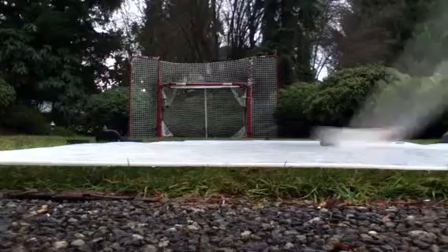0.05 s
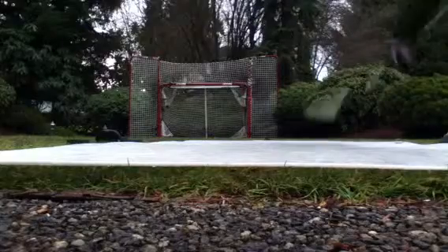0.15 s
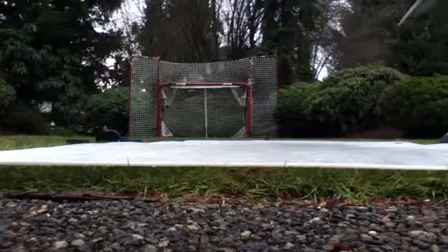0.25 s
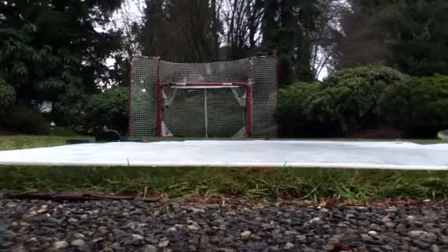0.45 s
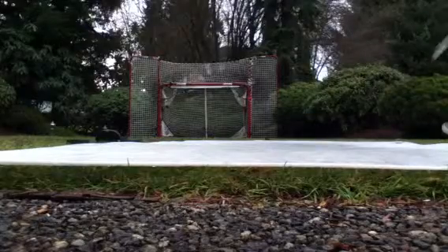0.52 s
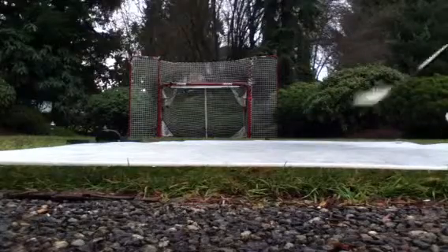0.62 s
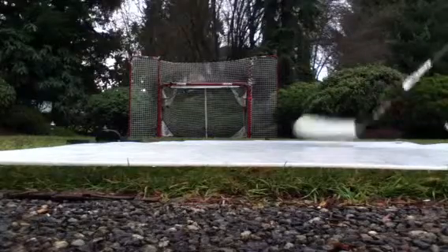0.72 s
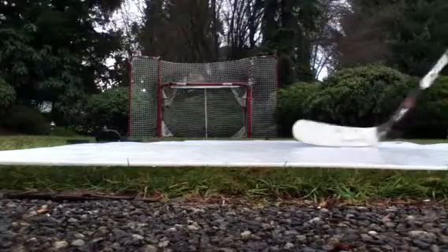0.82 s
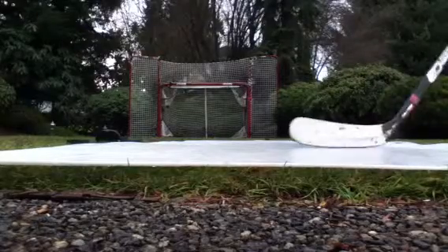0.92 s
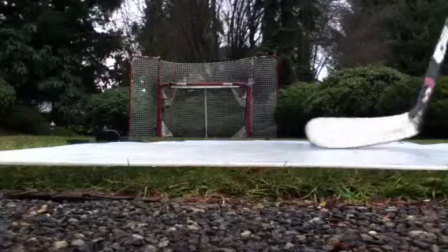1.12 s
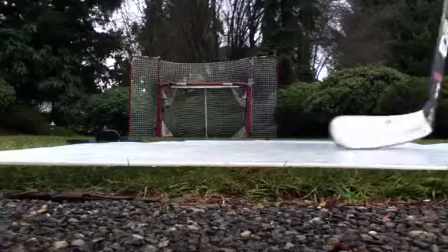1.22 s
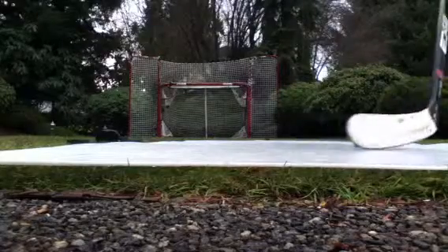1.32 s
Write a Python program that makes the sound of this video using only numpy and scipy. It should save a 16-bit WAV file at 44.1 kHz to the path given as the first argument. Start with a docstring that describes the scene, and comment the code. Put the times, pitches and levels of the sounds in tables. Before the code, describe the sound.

A hockey slap shot: the stick squeaks briefly, slaps a plastic pad and cracks against the puck. The puck clangs off a steel goal, then the blade drops back and scuffs. Heard from ground level in a quiet backyard.

```python
"""A hockey stick drives a slap shot in a quiet backyard. It squeaks by stick-slip friction, slaps a plastic
shooting pad and cracks against the puck. A third of a second later the puck excites the ringing modes of
a steel goal frame; then the blade drops back on the pad and scuffs it. Each impact is a short contact
pulse followed by damped vibration. Trees and walls scatter the blows over a faint hush and a low hum."""
import sys
import numpy as np
from scipy import signal
from scipy.fft import rfft, irfft
from scipy.io import wavfile
from scipy.ndimage import uniform_filter1d

SR = 44100
rng = np.random.default_rng(int(sys.argv[2]) if len(sys.argv) > 2 else 0)


def to_wav(sig):
    """Store sig (one row per channel, or 1-D mono) as 16-bit WAV at the path in sys.argv[1].

    Samples outside -1..1 are clipped; the rate is SR.
    """
    pcm = np.clip(np.atleast_2d(sig), -1, 1) * 32767
    pcm = np.round(pcm).astype(np.int16)
    wavfile.write(sys.argv[1], SR, pcm.T)  # frames by channels


N = 59535

# spectrum of the outdoor hush, and partials of the hum: f/Hz, relative level/dB
HUSH_SPECTRUM = [(30, -9), (70, -5), (130, 0), (300, -2), (500, -6), (800, -5), (1400, -7), (3000, -14),
                 (6000, -22), (12000, -27), (16000, -35)]
HUM_PARTIALS = [(122.5, 0), (243, -3)]
# envelopes of the hush and the hum: t/s, level/dB
HUSH_ENVELOPE = [(0, -48), (.19, -47.5), (.3, -55), (.7, -58), (.88, -55), (.97, -51), (1.07, -50),
                 (1.15, -53.5), (1.25, -50.5), (1.35, -50)]
HUM_ENVELOPE = [(0, -51), (.2, -49), (.33, -61), (.65, -62), (.85, -57), (1.05, -61), (1.35, -57)]
# scuffs of the stick: centre t/s, half-width/s, level/dB, peak f/Hz
SCUFFS = [(.009, .007, -45, 2500), (.025, .003, -40, 2900), (.105, .004, -33, 1400), (.207, .007, -41, 300),
          (1.045, .0055, -43, 1450), (1.21, .025, -54, 3000), (1.307, .002, -45.5, 1300)]
# thin cracks as the blade first touches the pad: t/s, level/dB
CRACKS = [(.2151, -1.5), (.9090, -25)]
# blows of the blade on the pad: t/s, click level/dB, contact time/s, thud gain/dB, clatter level/dB
SLAPS = [(.2163, -13, .0003, 0, -19.5), (.9093, -16, .00018, -6.5, -37)]
# modes of the pad: f/Hz, level/dB, T60/s
PAD_MODES = [(125, -27, .1), (215, -22, .04), (350, -9, .022), (540, -7, .013), (800, -12, .015),
             (1350, -21, .015), (1750, -22, .014), (3150, -21, .01)]
# spectra of a slap's crack, bright bite and clatter: f/Hz, relative level/dB
CRACK_SPECTRUM = [(2000, -35), (5000, -20), (7500, -5), (12000, 0), (16000, -1)]
BITE_SPECTRUM = [(1000, -12), (3000, 0), (5000, -6), (8000, -5), (16000, -14)]
CLATTER_SPECTRUM = [(60, -20), (200, -1), (500, 0), (1000, -4), (2000, -10), (4000, -18), (8000, -25),
                    (16000, -32)]
# knocks of puck and stick: t/s, level/dB, contact time/s, rebound f/Hz
KNOCKS = [(.2409, -7, .00012, 500), (.2413, 0, .0003, 750), (.2557, -10, .00014, 600),
          (.2586, -14, .0003, 600), (.2624, -13, .0005, 550), (.2638, -20, .0003, 1300),
          (.358, -28, .0003, 1200), (.9685, -32, .0005, 450), (1.0415, -29, .0004, 1250),
          (1.307, -34, .0004, 1200)]
# brief dip of the slap and background after the puck is hit: t/s, gain/dB
DIP = [(.242, 0), (.245, -26), (.251, -28), (.256, 0)]
# spectra of the scattered shot, clang and blade landing: f/Hz, relative level/dB
SHOT_NEAR_SPECTRUM = [(110, -26), (180, 1), (300, -2), (500, -2), (800, 1), (1400, 0), (2500, -8),
                      (5000, -18), (10000, -21), (16000, -38)]
SHOT_FAR_SPECTRUM = [(100, -16), (300, -6), (650, -1), (1000, -4), (1400, 1), (2200, -10), (5000, -21),
                     (10000, -34), (16000, -50)]
TREE_ECHO_SPECTRUM = [(100, -12), (200, -1), (650, 0), (1300, -6), (3000, -15), (8000, -28), (16000, -45)]
GOAL_NEAR_SPECTRUM = [(150, -28), (450, -20), (650, 1), (1400, 1), (2400, -1), (4500, -4), (8000, -8),
                      (12500, -13), (16000, -27)]
GOAL_FAR_SPECTRUM = [(350, -26), (650, 0), (1000, -1), (1450, 3), (2000, -2), (2700, -2), (5000, -10),
                     (9000, -18), (15000, -38)]
PAD_ECHO_SPECTRUM = [(120, -20), (250, 0), (650, -1), (1200, -14), (2500, -22), (6000, -40), (16000, -50)]
# faint ringing in the yard after the shot: onset t/s, then f/Hz, level/dB, T60/s
YARD_RING_S, YARD_RING = .27, [(1290, -42, .4), (1410, -38, .6), (1574, -47, .55)]
# modes of the steel goal frame: f/Hz, level/dB, T60/s
GOAL_MODES = [(1072, -35, .4), (1354, -36, .85), (1555, -13, .045), (1580, -24, .27), (1765, -21, .06),
              (2380, -33, .35), (2501, -17, .055), (2928, -27, .1), (3110, -26, .05), (3635, -32, .27),
              (3800, -25, .05), (3930, -24, .06), (4593, -27, .07), (4850, -26, .06), (7160, -32, .12),
              (11800, -26, .06)]
# spectrum of its densely spaced modes: f/Hz, relative level/dB
CLANG_SPECTRUM = [(150, -18), (330, -11), (480, -15), (900, -4), (1500, 0), (2300, 0), (4200, -2),
                  (6000, -6), (7400, -5), (10300, -17), (11700, -6), (13000, -12), (14000, -18),
                  (16000, -28)]
# discrete reflections of the clang: delay/s, gain/dB
GOAL_ECHOES = [(.0295, -17), (.042, -18)]

TIME = np.arange(N) / SR


def amp(db):
    """Amplitude ratio: a factor of ten for every 20 dB."""
    return 10 ** (np.asarray(db) / 20)


def envelope(points):
    """Amplitude envelope, linear in decibels between its points."""
    return amp(np.interp(TIME, *np.transpose(points)))


def swell(s, half_s, db):
    """Gaussian envelope centred on time s."""
    return amp(db) * np.exp(-.5 * ((TIME - s) / half_s) ** 2)


def decay(age, t60):
    """Exponential damping: the level falls 60 dB in t60 seconds."""
    return amp(-60 * age / t60)


def low_cut(x, hz):
    """Second-order high-pass: bass falls 12 dB per octave below the corner."""
    return signal.sosfilt(signal.butter(2, hz, "high", fs=SR, output="sos"), x + 1e-18)


def noise(spectrum):
    """Spectral shaping of white noise, normalised to unit rms."""
    hz, db = np.transpose(spectrum)
    freqs = np.maximum(np.arange(N // 2 + 1) * SR / N, 1)
    bass_rolloff = np.minimum(freqs / hz[0], 1) ** 2
    gain = amp(np.interp(np.log(freqs), np.log(hz), db)) * bass_rolloff
    shaped = irfft(rfft(rng.standard_normal(N)) * gain, N)
    return shaped / np.std(shaped)


def burst(spectrum, s, db, t60, attack_s=2 / SR):
    """Exponential build-up and decay of coloured noise."""
    age = np.maximum(TIME - s, 0)
    return amp(db) * noise(spectrum) * (1 - np.exp(-age / attack_s)) * decay(age, t60)


def mode(s, hz, db, t60):
    """Free vibration of one mode: a damped sinusoid."""
    age = np.maximum(TIME - s, 0)
    return amp(db) * np.sin(2 * np.pi * hz * age) * decay(age, t60)


def contact(s, db, contact_s):
    """Pressure pulse of a hard collision: the shorter the contact, the wider the spectrum."""
    progress = np.clip((TIME - s) / contact_s, 0, 1)
    return amp(db) * (4 * progress * (1 - progress)) ** .3   # a power below 1 steepens the edges


def knock(s, db, contact_s, hz):
    """A contact pulse drives a damped resonator, which loses 60 dB in two cycles."""
    radius = decay(1 / SR, t60=2 / hz)
    feedback = [1, -2 * radius * np.cos(2 * np.pi * hz / SR), radius ** 2]
    return signal.lfilter([1, -2, 1], feedback, contact(s, db, contact_s) + 1e-18)


def background():
    """Ambient sound: broadband outdoor hush superposed on the two partials of a distant hum."""
    hum = sum(amp(db) * np.sin(2 * np.pi * (hz * TIME + rng.random())) for hz, db in HUM_PARTIALS)
    return envelope(HUSH_ENVELOPE) * noise(HUSH_SPECTRUM) + envelope(HUM_ENVELOPE) * hum


def stick_scuffs(rise_db_per_octave=10, fall_db_per_octave=8, top_hz=11000):
    """Sliding friction gives soft swells of noise, each with one broad spectral peak."""
    octaves = np.arange(-4, 6)
    shape_db = np.minimum(rise_db_per_octave * octaves, -fall_db_per_octave * octaves)
    friction = sum(swell(s, half_s, db) * noise(np.transpose([hz * 2. ** octaves, shape_db]))
                   for s, half_s, db, hz in SCUFFS)
    return signal.sosfilt(signal.butter(2, top_hz, fs=SR, output="sos"), friction)


def stick_squeak(start_s=.095, length_s=.016, from_hz=1400, to_hz=2050):
    """Stick-slip oscillation: a rising tone and its octave, roughened by frequency jitter."""
    progress = np.clip((TIME - start_s) / length_s, 0, 1)
    jitter = uniform_filter1d(rng.standard_normal(N), size=20)
    glide_hz = from_hz + (to_hz - from_hz) * progress
    hz = glide_hz * (1 + .075 * jitter / np.std(jitter))
    phase = 2 * np.pi * np.cumsum(hz) / SR
    tone = np.sin(phase) + amp(-15) * np.sin(2 * phase)
    return amp(-26.5) * np.sin(np.pi * progress) * tone


def pad_slaps():
    """Impact excitation: the blade cracks and clatters on the pad, whose damped modes give a thud."""
    cracks = sum(burst(CRACK_SPECTRUM, s, db, t60=.005) for s, db in CRACKS)
    grind = swell(s=.239, half_s=.0035, db=-24) * noise(CLATTER_SPECTRUM)   # blade slides into the puck
    sound = cracks + grind
    for s, click_db, contact_s, thud_db, clatter_db in SLAPS:
        thud = sum(mode(s, hz, db + thud_db, t60) for hz, db, t60 in PAD_MODES)
        clatter = burst(CLATTER_SPECTRUM, s, clatter_db, t60=.11, attack_s=.001)
        click = contact(s, click_db, contact_s)
        bite = burst(BITE_SPECTRUM, s, click_db - 13, t60=.02)
        bass_edge_hz = 125 / amp(thud_db)   # lighter blows carry less bass
        sound += low_cut(click + bite + thud + clatter, bass_edge_hz)
    return sound


def blade_knocks():
    """Each hard collision on the blade also excites a bending mode of the shaft."""
    return sum(knock(s, db, contact_s, hz) + mode(s, hz=175, db=db - 17, t60=.018)
               for s, db, contact_s, hz in KNOCKS)


def yard_scatter():
    """Diffuse scattering: near walls return short tails of noise, far trees longer and fainter ones."""
    shot = burst(SHOT_NEAR_SPECTRUM, s=.252, db=-26, t60=.42, attack_s=.014)
    shot += burst(SHOT_FAR_SPECTRUM, s=.27, db=-36.5, t60=1.3, attack_s=.04)
    ringing = sum(mode(YARD_RING_S, hz, db, t60) for hz, db, t60 in YARD_RING)
    tree_echo = swell(s=.5, half_s=.045, db=-45) * noise(TREE_ECHO_SPECTRUM)
    clang = burst(GOAL_NEAR_SPECTRUM, s=.583, db=-24.2, t60=.28, attack_s=.011)
    clang += burst(GOAL_FAR_SPECTRUM, s=.63, db=-39.5, t60=1.6, attack_s=.04)
    landing = burst(PAD_ECHO_SPECTRUM, s=.919, db=-34, t60=.2, attack_s=.006)
    return shot + ringing + tree_echo + clang + landing


def goal_clang(hit_s=.567, lag_s_per_hz=2.5e-7):
    """Modal vibration of the struck steel frame; its clack and dense clang are reflected twice."""
    # higher modes set in slightly later
    modes = sum(mode(hit_s + lag_s_per_hz * hz, hz, db, t60) for hz, db, t60 in GOAL_MODES)
    ringing = low_cut(modes, hz=700)   # a small radiator gives out little bass
    clack = knock(hit_s, db=-5, contact_s=.00024, hz=1250)
    clang = burst(CLANG_SPECTRUM, hit_s, db=-12.5, t60=.064, attack_s=.0025)
    crash = clack + clang
    echoes = sum(amp(db) * np.interp(TIME - delay, TIME, crash) for delay, db in GOAL_ECHOES)
    return ringing + crash + echoes


def scene():
    """Superposition of all sources, heard from the ground behind the pad."""
    dipped = (background() + pad_slaps()) * envelope(DIP)
    return (dipped + stick_scuffs() + stick_squeak() + blade_knocks() + yard_scatter() + goal_clang())[None]


def record(dry, saturation=.9, top_hz=16300):
    """Band limiting and soft saturation: the microphone loses deep bass, rounds peaks and cuts the top."""
    rounded = saturation * np.tanh(low_cut(dry, hz=50) / saturation)
    return signal.sosfilt(signal.ellip(10, .1, 80, top_hz, fs=SR, output="sos"), rounded)


dry = scene()
out = record(dry)
to_wav(out)
```